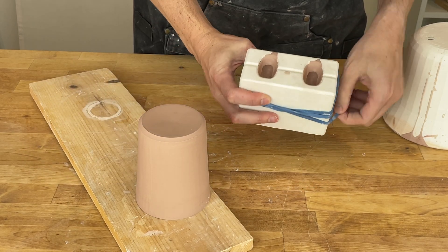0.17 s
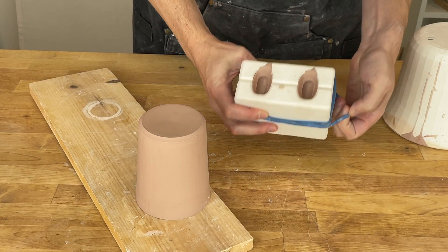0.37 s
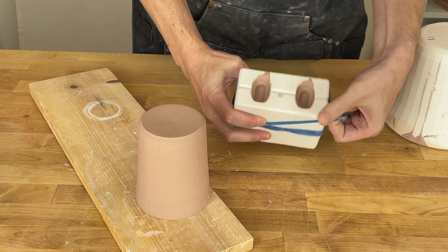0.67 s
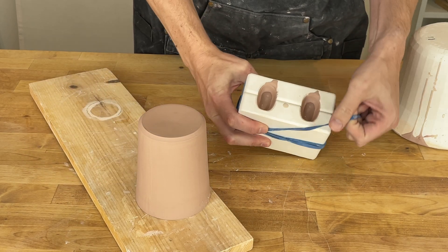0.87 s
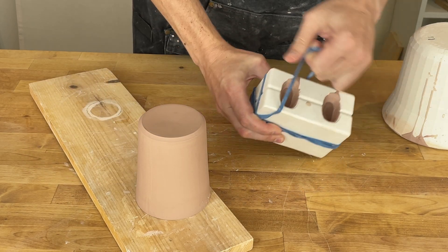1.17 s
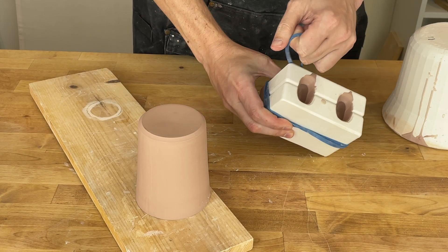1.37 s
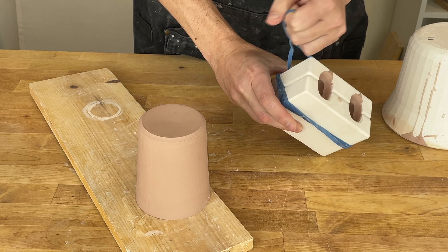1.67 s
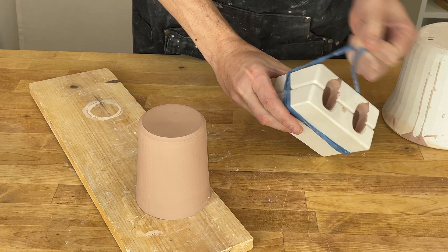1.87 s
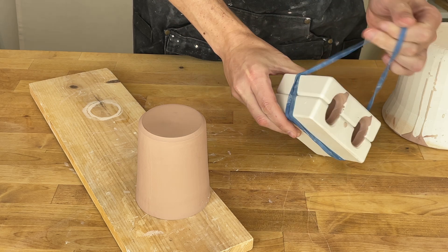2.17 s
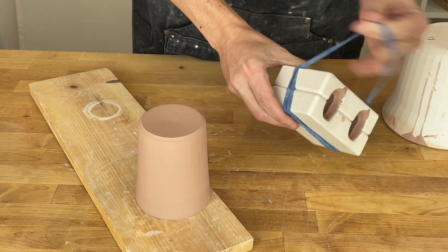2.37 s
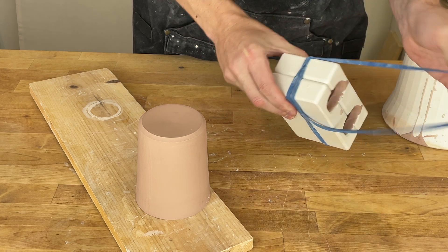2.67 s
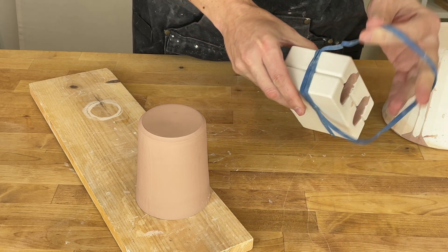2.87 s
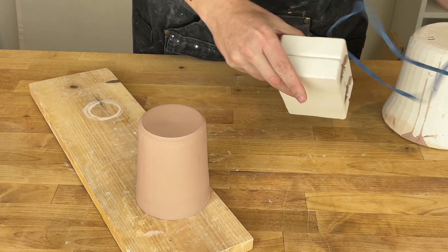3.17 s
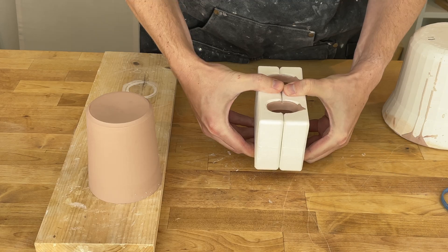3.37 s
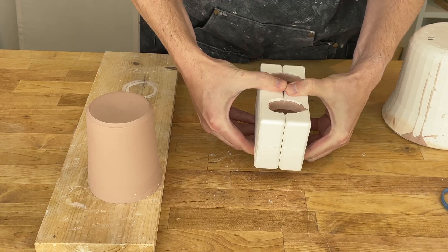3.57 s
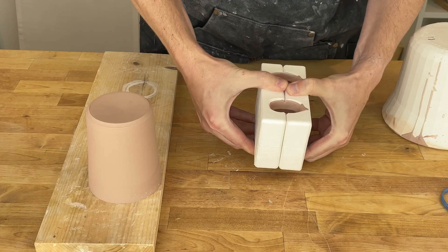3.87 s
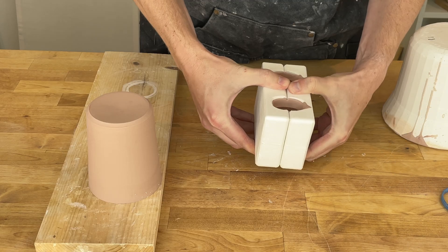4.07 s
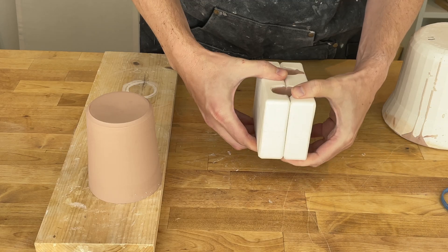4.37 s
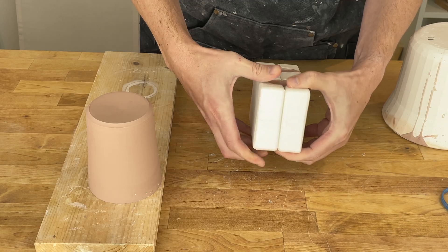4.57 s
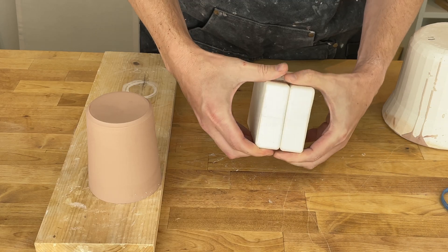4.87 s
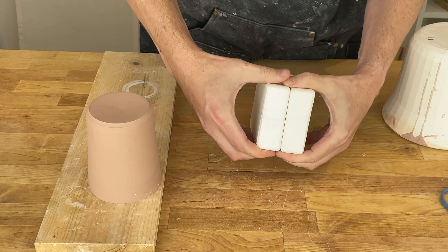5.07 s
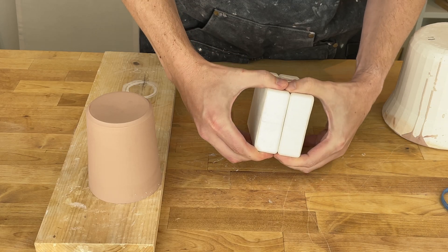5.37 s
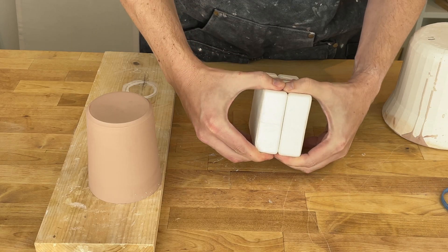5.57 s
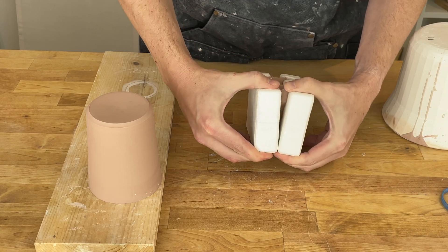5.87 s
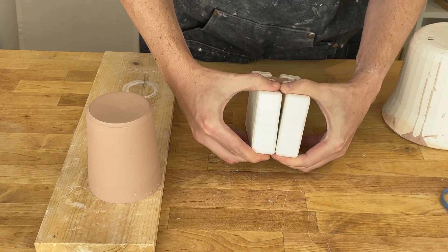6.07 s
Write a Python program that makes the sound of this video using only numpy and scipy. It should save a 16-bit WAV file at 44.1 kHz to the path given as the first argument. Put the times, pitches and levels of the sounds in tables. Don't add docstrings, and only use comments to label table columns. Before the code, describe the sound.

Close in a small, hard-walled pottery workshop, fingers rub stretched rubber bands over a plaster mould. Light ticks and snaps lead into several hard, hollow knocks with short bright echoes, the strongest just after one second. Softer scrapes, bumps and small snaps follow as the bands come off. After a nearly silent pause with faint rubbing, the plaster halves give a soft knock and then a firmer clunk. Low ventilation and faint hum continue beneath.

```python
import sys
import numpy as np
from scipy import signal
from scipy.fft import rfft, irfft
from scipy.io import wavfile

SR = 44100
rng = np.random.default_rng(int(sys.argv[2]) if len(sys.argv) > 2 else 0)


def digitize_waveform(pressure):
    field = np.atleast_2d(pressure).T
    bounded = np.clip(field, -1, 1)
    quanta = np.round(bounded * 32767).astype(np.int16)
    wavfile.write(sys.argv[1], SR, quanta)


def how_loud(loudness_db):
    steps = np.asarray(loudness_db, float) / 20
    return 10 ** steps


N = 273728


def rms_one(x):
    return x / np.sqrt(np.mean(x ** 2) + 1e-20)


def band(x, low_hz, high_hz, order=2):
    return signal.sosfilt(signal.butter(order, [low_hz, high_hz], "band", fs=SR, output="sos"), x)


def resonate(x, hz, width_hz):
    r = np.exp(-np.pi * width_hz / SR)
    feedback = [1, -2 * r * np.cos(2 * np.pi * hz / SR), r * r]
    return signal.lfilter(np.array([1, 0, -1]) * (1 - r * r) / 2, feedback, x)


def add(out, s, sound):
    i = round(s * SR)
    out[i:i + len(sound)] += sound[:len(out) - i]


def push(hz, damping_s, sag=0):
    t = np.arange(round(14 * damping_s * SR)) / SR
    phase = 2 * np.pi * hz * t / (1 + sag * hz * t)
    swing = t ** 2 * np.exp(-t / damping_s) * np.sin(phase)
    return swing / np.abs(swing).max()


def strokes(rows):
    edge_db, fade_s = -20, .0055
    t, plain, tilted = np.arange(N) / SR, 0, 0
    for start, length, db, place, *tilt_db in rows:
        knots = start + length * np.array([0, np.clip(place, .01, .99), 1])
        fade = np.clip(np.minimum(t - start, start + length - t) / fade_s, 0, 1)
        gain = fade * how_loud(db + np.interp(t, knots, [edge_db, 0, edge_db]))
        plain = plain + gain
        tilted = tilted + gain * how_loud(sum(tilt_db))
    return plain, tilted


def grit(per_s, spread_db):
    sizes = how_loud(spread_db * np.minimum(rng.exponential(1, N), 4)) * rng.choice([-1, 1], N)
    slips = sizes * (rng.random(N) < per_s / SR)
    return rms_one(slips) + .14 * rng.standard_normal(N)


def knock_path():
    # (delay/ms, pressure ratio)
    echoes = [(0.0, 1.0), (2.4, -0.72), (3.9, -0.45), (4.9, 0.27), (6.9, 0.28), (14.5, -0.36), (16.1, 0.24),
              (19.7, -0.35), (23.4, -0.48), (26.2, 0.39), (31.0, -0.49), (35.1, -0.28), (41.3, -0.24),
              (49.3, -0.26), (51.6, -0.29)]
    # (f/Hz, width/Hz, level/dB)
    wash_modes = [(115, 10, 8), (146.2, 8, 8.5), (191, 6, 2.5), (244.2, 4.2, 8.5), (272, 7.8, 8.5),
                  (392, 8.9, -3), (463.4, 26, 2), (519.4, 4.9, -0.5), (612, 34, 0), (710, 30, 0)]
    wash_db, rise_s, t60_s = -17.5, .025, .62
    far_walls_s, far_walls_drop_db = .108, 5
    t = np.arange(SR // 2) / SR
    white = rng.standard_normal(len(t))
    modes = sum(how_loud(db) * resonate(white, hz, width_hz) for hz, width_hz, db in wash_modes)
    path = how_loud(-27) * (rms_one(modes) + 1.5 * white)
    thinned = np.clip((t - far_walls_s) / .0065, 0, 1)
    path *= 1 - np.exp(-t / rise_s)
    path *= how_loud(wash_db - 60 * t / t60_s - far_walls_drop_db * thinned)
    for delay_ms, ratio in echoes:
        add(path, delay_ms / 1000, np.array([ratio]))
    return path


def knocks():
    # (t/s, level/dB, f/Hz)
    blows = [
        (.6855, -38, 680),
        (.87927, -6.6, 381),
        (1.1650, -27, 440),
        (1.22724, -2.6, 348),
        (1.44475, -10, 319),
        (5.60856, -22, 275),
        (5.8870, -29, 460),
        (5.96108, -12, 389),
    ]
    # (crack level/dB, brightness/dB, thud level/dB)
    blow_edges = [(-46, -30, -64), (-13.5, -28.5, -30), (-42.5, -31.5, -56), (-9.5, -23.5, -23.5),
                  (-19.5, -49, -26), (-31.5, -23, -29.5), (-39, -28, -49), (-21.5, -23, -32)]
    body, thud, dull, bright = np.zeros((4, N))
    for (s, db, hz), (crack_db, bright_db, thud_db) in zip(blows, blow_edges):
        add(body, s, how_loud(db) * push(hz, .0008))
        add(thud, s, how_loud(thud_db) * push(75, .0031))
        add(dull, s, how_loud([crack_db]))
        add(bright, s, how_loud([crack_db + bright_db]))
    t = np.arange(SR // 50) / SR
    grains = rng.standard_normal(len(t)) * np.exp(-t / .0054)
    grind = .44 * band(signal.fftconvolve(bright, grains)[:N], 2000, 12000, order=1)
    edge = 5.7 * band(dull, 540, 960) - 1.17 * band(dull, 1150, 1903)
    edge += 4.9 * band(bright, 2000, 4800) + .4 * bright
    echoing = signal.fftconvolve(body, knock_path())[:N]
    return echoing + thud + grind + mould(how_loud(21.5) * bright), edge


def mould(x):
    # (f/Hz, width/Hz, level/dB)
    modes = [(1300, 90, -3.0), (1920, 120, -1), (3300, 200, 0), (4140, 170, -1.5), (4983, 170, -0.5),
             (5520, 170, 0)]
    ring = 0
    for k, (hz, width_hz, db) in enumerate(modes):
        ring = ring + (-1) ** k * how_loud(db - 3) * resonate(x, hz, width_hz)
    return ring


def contact(drive, hz, width_hz):
    slap = band(drive[0], 900, 2800)
    ring = resonate(resonate(drive[1], hz, width_hz), hz, 2.5 * width_hz)
    snap = band(drive[2], 6000, 19845)
    return slap, ring, snap


def ticks():
    # (t/s, ring level/dB, ring f/Hz, slap level/dB, snap level/dB)
    snap_rows = [(0.6815, -36, 3940, -32, -48.5), (0.694, -32.5, 3820, -54, -29.5),
                 (0.7074, -32, 4000, -63, -32), (0.7436, -30, 4087, -33.5, -22),
                 (1.1665, -21, 3380, -15, -20.5), (1.1730, -38, 4000, -29, -19),
                 (1.395, -45, 4120, -38, -43), (1.6187, -51, 4130, -60, -56), (1.6395, -46, 4400, -50, -39),
                 (1.6526, -57, 3730, -51, -47), (1.6742, -38, 5960, -50, -43),
                 (1.9856, -36, 6740, -41.5, -32), (2.1027, -56, 3550, -42.5, -39),
                 (2.1572, -53, 2550, -43, -49), (2.5559, -38, 3520, -43, -30),
                 (3.1221, -38.5, 3050, -53, -49)]
    # (t/s, ring level/dB, ring f/Hz, slap level/dB)
    tick_rows = [(0.6854, -27.5, 3900, -29), (0.9405, -44, 3900, -52.5), (0.9881, -33.5, 2629, -39),
                 (1.367, -43, 3800, -40), (1.3777, -45, 2500, -32), (1.3876, -35.5, 4020, -37),
                 (1.4106, -24.5, 4070, -28.5), (1.5787, -38.5, 6400, -44), (1.6034, -45.5, 4350, -51),
                 (1.685, -50, 4410, -42.5), (2.151, -42, 2480, -63), (2.6015, -39.5, 4900, -41.5),
                 (3.1439, -39.5, 3330, -67.5), (5.1816, -49, 2930, -64), (5.351, -54.5, 3290, -41),
                 (5.8871, -34.5, 3170, -35), (5.8923, -35.5, 4780, -41), (5.943, -52, 3000, -62)]
    # (t/s, ring level/dB, ring f/Hz, slap level/dB, snap level/dB)
    crack_rows = [
        (1.1677, -10, 4000, -28, -33),
    ]
    hits = [(*row, .9) for row in snap_rows]
    hits += [(*row, row[1] - 28, .65) for row in tick_rows]
    hits += [(*row, .35) for row in crack_rows]
    near, around = np.zeros((2, N))
    t = np.arange(round(.04 * SR)) / SR
    click = np.tile(t == 0, (3, 1)) * 1.
    for s, ring_db, hz, slap_db, snap_db, decay_ms in hits:
        decay_s = decay_ms / 1000
        burst = rng.standard_normal((3, len(t))) * np.exp(-t / decay_s) + 2 * click
        heard = contact(burst, hz, min(.87 / decay_s, 1600))
        spread = contact(click, hz, 2500)
        for part, even, db in zip(heard, spread, (slap_db, ring_db, snap_db)):
            part = how_loud(db) * part / np.abs(part).max()
            add(near, s + .0006, part)
            add(around, s, np.std(part) * rms_one(even))
    return near, around


def rubs():
    # (start t/s, length/s, peak level/dB, peak place 0-1, brightness/dB)
    rub_rows = [(-.3, 0.9, -62.5, 0.28, -8), (.25, 0.62, -66.5, 0.33, -7.5), (.58, 0.15, -61, .8, -4),
                (.75, 0.17, -54.5, .05, -4), (.99, 0.32, -62.5, 0.1, -4.5), (1.29, 0.093, -72, .2, -9),
                (1.35, 0.25, -50.5, 0.13, -8), (1.57, 0.37, -62, 0.03, -5), (1.99, .05, -69, 0.07, 9),
                (2.14, 0.095, -57.5, 0, -5.5), (2.43, 0.11, -68.5, 0.3, 5), (2.56, 0.033, -45, 0, -12),
                (2.585, 0.15, -57.5, 0, -3), (2.94, 0.039, -62, 0.4, -1), (3.11, 0.26, -60, .05, -6.5),
                (3.28, 0.13, -70, .6, -2.5), (4.21, 0.27, -65.5, 0.42, -11), (4.7, 0.19, -72, 0.27, -7),
                (4.91, 0.15, -60, 0.58, -5.5), (5.2, 0.08, -61, 0.53, -6)]
    rub, bright = strokes(rub_rows)
    slips = grit(per_s=2100, spread_db=3.5)
    rubbing = band(slips, 2300, 7000) + .84 * resonate(slips, 4100, 600)
    return rub * rms_one(rubbing) + bright * rms_one(band(slips, 7500, 14000))


def scuffs():
    starts_s = [.680, .742, 1.163, 2.1, 2.15, 2.552, 3.125, 5.883]
    # (length/s, peak level/dB)
    scuff_rows = [(0.075, -45.5), (0.033, -51), (0.06, -34), (0.048, -54.5), (0.13, -58), (.12, -52),
                  (0.15, -51), (0.064, -42.5)]
    gain, _ = strokes([(s, *row, .1) for s, row in zip(starts_s, scuff_rows)])
    return gain * rms_one(band(grit(per_s=1300, spread_db=2.5), 150, 1500))


def rumble():
    # (start t/s, length/s, peak level/dB, peak place 0-1)
    rumble_rows = [
        (-.4, 0.96, -62, 0.52),
        (.2, 1.47, -56, 0.08),
        (1.5, 0.39, -47, 0.32),
        (1.7, 1.58, -53.5, 0.23),
        (2.6, 1.14, -60, 0.63),
        (4.4, 1.35, -62.5, 0.25),
        (5.885, .3, -39, 0.03),
    ]
    gain, _ = strokes(rumble_rows)
    return gain * how_loud(-4) * rms_one(band(grit(per_s=540, spread_db=-2), 30, 450))


def bumps():
    # (t/s, peak level/dB, f/Hz)
    bump_rows = [(0.174, -44, 170), (0.322, -27.5, 138), (0.351, -37, 127), (0.394, -47, 221),
                 (0.432, -43, 145), (0.448, -44, 125.4), (0.572, -73, 223), (1.987, -42.5, 147),
                 (2.002, -44, 126), (2.176, -43.5, 125), (2.195, -47, 191), (2.537, -36.5, 191),
                 (2.551, -44, 128), (2.704, -48, 194), (2.869, -44.5, 241), (3.135, -41.5, 190),
                 (3.204, -35.5, 200), (3.218, -42.5, 125), (3.364, -52.5, 164), (3.395, -65, 127)]
    out = np.zeros(N)
    for s, db, hz in bump_rows:
        add(out, s + .002, -how_loud(db + 1.5) * push(1.6 * hz, .3 / hz, sag=.4))
    return band(out, 65, 2000, order=1)


def squeaks():
    # (start t/s, end t/s, f/Hz, width/Hz, level/dB)
    squeak_rows = [(0, 0.17, 4040, 700, -75), (0.313, 0.34, 4250, 900, -62.5), (.62, 0.699, 4100, 500, -68),
                   (1.006, 1.118, 6000, 500, -67), (1.952, 1.997, 7150, 600, -63),
                   (2.94, 2.98, 4300, 500, -68), (3.113, 3.2, 3200, 500, -59.5),
                   (4.93, 5.036, 3970, 900, -73), (5.882, 5.918, 3170, 500, -55)]
    out = np.zeros(N)
    for start, end, hz, width_hz, db in squeak_rows:
        white = rng.standard_normal(round((end - start) * SR))
        tone = resonate(resonate(white, hz, width_hz), hz, width_hz)
        add(out, start, how_loud(db) * rms_one(tone) * np.sqrt(np.hanning(len(tone))))
    return out


def workshop(x):
    # (f/Hz, t/s)
    room_t60 = [(500, .45), (1500, 0.52), (4000, 0.43), (9000, 0.33), (15000, 0.51)]
    t, tail = np.arange(SR // 2) / SR, 0
    hz, t60 = np.transpose(room_t60)
    edges = 200 * 2 ** np.arange(0, 6.6, .5)
    for low, high in zip(edges, edges[1:]):
        decay_s = np.interp(np.log(low * high) / 2, np.log(hz), t60)
        tail = tail + band(rng.standard_normal(len(t)), low, high) * how_loud(-60 * t / decay_s)
    tail *= np.clip(t / .00093 - 1, 0, 1)
    tail *= 1 + 1.5 * np.exp(-t / .015)
    return signal.fftconvolve(x, tail / np.sqrt(np.sum(tail ** 2)))[:N]


def ventilation():
    # (f/Hz, level per Hz/dB)
    air_colour = [(15, -32.5), (40, -7.5), (120, 0), (400, -11.5), (1500, -14.5), (3500, -18.5),
                  (8000, -20), (15800, -23.5)]
    air_hz, air_db = np.transpose(air_colour)
    hz = np.maximum(np.fft.rfftfreq(N, 1 / SR), 1)
    colour = how_loud(np.interp(np.log(hz), np.log(air_hz), air_db))
    return how_loud(-63.5) * rms_one(irfft(rfft(rng.standard_normal(N)) * colour, N))


def electrics():
    # (f/Hz, rms level/dB)
    hum = [(59.2, -74.5), (360.7, -72.5)]
    whine_db = [-79.5, -74.5, -97, -82.5, -81.5, -94.5, -81.5, -86.5, -87.5, -85, -87, -87.5, -89, -91]
    t = np.arange(N) / SR
    whine = [(500.1 * (k + 1), db) for k, db in enumerate(whine_db)]
    tones = 0
    for hz, db in hum + whine:
        tones = tones + np.sqrt(2) * how_loud(db) * np.sin(2 * np.pi * (hz * t + rng.random()))
    return tones


def scene():
    boom, edge = knocks()
    snaps, around = ticks()
    tail = workshop(how_loud(14) * edge + how_loud(-6.5) * around)
    handling = rubs() + scuffs() + rumble()
    steady = tail + handling + ventilation() + electrics()
    steady = signal.sosfilt(signal.cheby2(12, 50, 15900, fs=SR, output="sos"), steady)
    return (boom + edge + snaps + mould(around) + bumps() + squeaks() + steady)[None]


def roll_off(x):
    return signal.sosfilt(signal.butter(12, 16840, fs=SR, output="sos"), x)


def record(dry):
    mix = signal.sosfilt(signal.cheby2(12, 60, 16900, fs=SR, output="sos"), dry)
    return roll_off(mix)


dry = scene()
out = record(dry)
digitize_waveform(out)
```